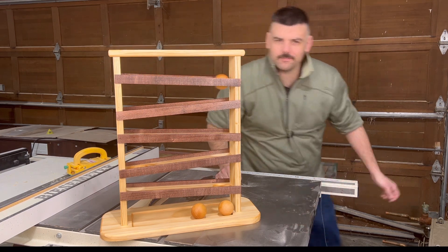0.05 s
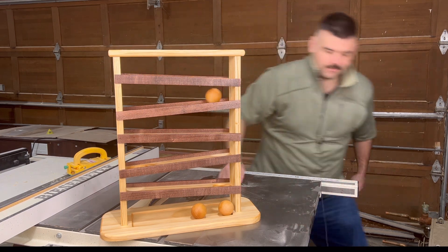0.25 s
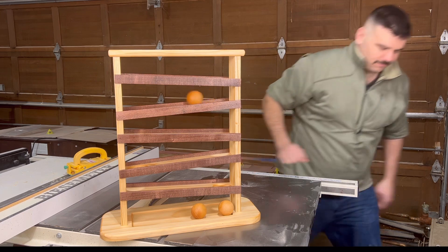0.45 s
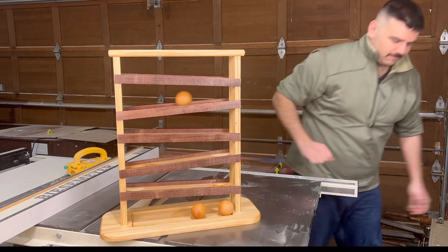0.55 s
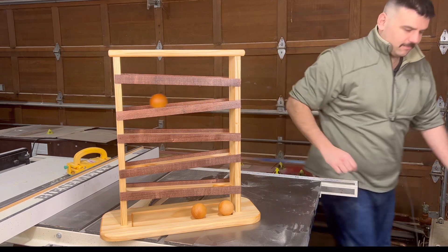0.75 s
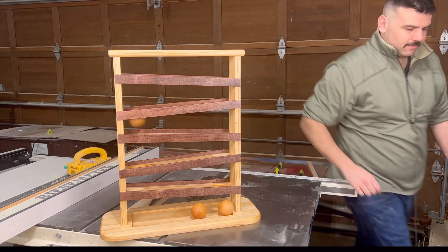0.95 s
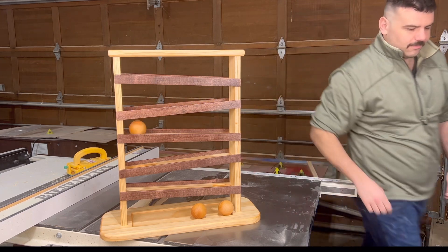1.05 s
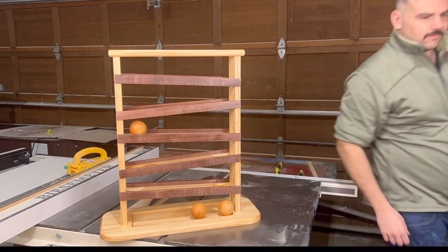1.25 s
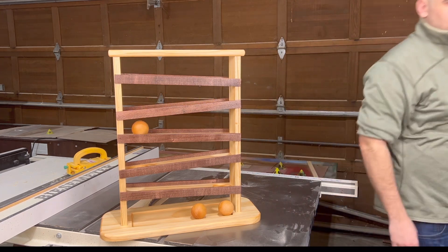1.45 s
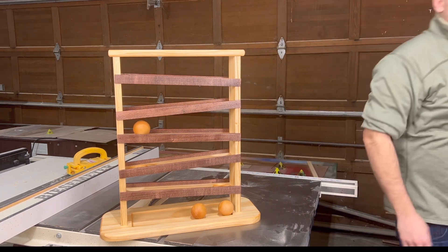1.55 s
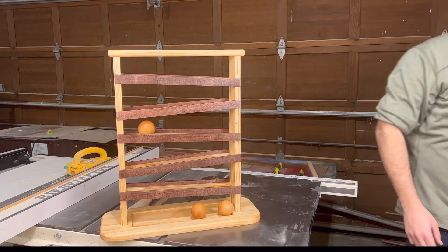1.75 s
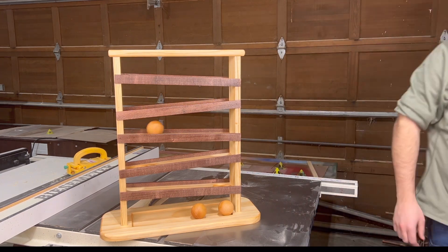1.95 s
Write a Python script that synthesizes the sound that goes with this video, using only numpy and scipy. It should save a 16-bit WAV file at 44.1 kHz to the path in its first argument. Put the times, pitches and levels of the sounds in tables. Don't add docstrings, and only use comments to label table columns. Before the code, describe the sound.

A wooden ball knocks sharply down wooden ramps in an echoing workshop, rolling faintly between drops.

```python
import sys
import numpy as np
from scipy import signal
from scipy.fft import rfft, irfft, next_fast_len
from scipy.io import wavfile

SR = 44100
rng = np.random.default_rng(int(sys.argv[2]) if len(sys.argv) > 2 else 0)


def ratio(d):
    e = np.asarray(d, float) / 20
    return 10 ** e


def file_out(sig):
    cols = np.atleast_2d(sig).T
    lim = np.clip(cols, -1, 1)
    pcm = np.round(lim * 32767).astype(np.int16)
    wavfile.write(sys.argv[1], SR, pcm)


N = 88200


def unit(x):
    return x / np.sqrt(np.mean(x ** 2) + 1e-20)


def along(points, hz):
    f, v = np.transpose(points)
    return np.interp(np.log(hz + 1), np.log(f + 1), v)


def curve(rows):
    return np.interp(np.arange(N) / SR, *np.transpose(rows))


def coloured(x, spectrum):
    m = next_fast_len(len(x) + 8192)
    gain = ratio(along(spectrum, np.fft.rfftfreq(m, 1 / SR)))
    return unit(irfft(rfft(x, m) * gain, m)[:len(x)])


def add(out, s, x):
    part = out[round(s * SR):][:len(x)]
    part += x[:len(part)]


def ring(hz, t60, t, rise):
    return np.sin(2 * np.pi * hz * t) * ratio(-60 * t / t60) * (1 - np.exp(-t / rise))


def grains(spectrum, spiky_db):
    strength_db = spiky_db * np.minimum(rng.exponential(size=N), 5)
    return coloured(rng.standard_normal(N) * ratio(strength_db), spectrum)


def air():
    # frequency in Hz, density in dB per Hz.
    hush_colour = [(12, -23.5), (22, 8), (35, -9.5), (86, -14.5), (450, -29), (1650, -37.5), (9950, -50),
                   (15500, -60.5), (16800, -120)]
    # time in seconds, level of the sway in dB.
    sway_level = [(0, -38), (.4, -26.5), (.8, -38), (1.1, -29.5), (1.38, -22.5), (1.7, -30), (1.93, -28.5),
                  (2, -27)]
    # frequency in Hz, gain in dB.
    sway_colour = [(.5, -36.5), (2, 4), (4, -8.5), (9, -5), (18, -48.5), (40, -33.5), (100, -120)]
    hush = ratio(-48.5) * coloured(rng.standard_normal(N), hush_colour)
    sway = ratio(curve(sway_level)) * coloured(rng.standard_normal(N), sway_colour)
    return hush + sway


def shirt_rustle():
    # time in seconds, level in dB.
    rustle_level = [(0, -66.5), (.06, -53), (.12, -64), (.17, -52), (.3, -65), (.44, -48.5), (.6, -67.5),
                    (.9, -82), (1.25, -66), (1.41, -59), (1.56, -78), (1.7, -65), (1.83, -69.5),
                    (1.96, -55.5), (2, -59.5)]
    # frequency in Hz, density in dB per Hz.
    cloth_colour = [(1400, -31.5), (2300, -6.5), (3100, 0.5), (3600, -2), (4700, -2), (9300, -18),
                    (16000, -36.5)]
    return ratio(curve(rustle_level)) * grains(cloth_colour, spiky_db=2.5)


def shirt_ticks():
    # start in seconds, level in dB, pitch in Hz.
    ticks = [(.1345, -50, 5000), (.569, -52, 9000), (.630, -51, 10000), (.691, -48, 9000),
             (.720, -53, 7000), (1.294, -50, 8500), (1.323, -49, 10000), (1.354, -53, 11000),
             (1.378, -45, 5000), (1.387, -50, 11000), (1.394, -53, 12000), (1.404, -52, 11000),
             (1.423, -50, 6500), (1.435, -47, 9000), (1.4385, -49, 6500), (1.448, -49, 7000),
             (1.463, -47, 6500), (1.6853, -51, 5000), (1.7115, -51, 5000), (1.7537, -47, 10000),
             (1.9428, -52, 3200), (1.9652, -46, 4000)]
    decay_cycles, gain_db = 1.4, 7
    out, t = np.zeros(N), np.arange(SR // 4) / SR
    for s, db, hz in ticks:
        t60 = decay_cycles / hz * np.log(1000)
        add(out, s, ratio(db + gain_db) * ring(hz, t60, t, .00005))
    return out


def footfalls():
    # start in seconds, level in dB, pitch in Hz, t60 in seconds.
    thumps = [
        (.085, -20, 66.5, 0.033),
        (0.269, -26.5, 30, 0.18),
        (1.073, -33, 73, 0.023),
        (1.374, -24, 148, 0.0186),
        (1.964, -28.5, 300, 0.032),
        (1.957, -32, 60, 0.12),
    ]
    out, t = np.zeros(N), np.arange(SR // 4) / SR
    for s, db, hz, t60 in thumps:
        add(out, s, ratio(db) * ring(hz, t60, t, 0.3 / hz))
    return out


def rolling():
    # time in seconds, level in dB.
    roll_level = [(0, -49.5), (.1, -43.5), (.2, -48.5), (.6, -53), (.9, -57), (1.5, -56), (1.62, -82),
                  (1.69, -55.5), (1.74, -47), (1.82, -60), (1.9, -55.5), (2, -57.5)]
    # frequency in Hz, density in dB per Hz.
    rail_colour = [(120, -25.5), (200, -10.5), (224, -13.5), (343, 3.5), (394, 0.5), (878, -2.5),
                   (1220, -7), (1860, -7), (4000, -51.5), (5200, -83), (8800, -120)]
    return ratio(curve(roll_level)) * grains(rail_colour, spiky_db=6.5)


def room(x):
    # frequency in Hz, t60 in seconds.
    room_decay = [(100, 1.3), (300, 0.6), (1000, 0.74), (3000, 0.62), (8000, 0.5), (15000, 0.26)]
    first_wall_s, build_s = 0.0068, 0.0065
    hz, t, z = signal.stft(rng.standard_normal(SR), SR, nperseg=256)
    decay = ratio(-60 * t / along(room_decay, hz)[:, None])
    tail = signal.istft(z * decay, SR, nperseg=256)[1]
    tail = tail * (1 - np.exp(-np.arange(len(tail)) / SR / build_s))
    delayed = np.pad(x, (round(first_wall_s * SR), 0))
    return signal.fftconvolve(delayed, tail / np.linalg.norm(tail))


def frame_modes(modes, level_db, softer_db_per_khz, rise_s, t):
    far_db_per_khz = -2
    low_rise_cycles = 2.2
    body, far = np.zeros(len(t)), np.zeros(len(t))
    for hz, db, t60 in modes:
        mode_db = level_db + db + softer_db_per_khz * hz / 1000
        mode = ratio(mode_db) * ring(hz, t60, t, max(rise_s, low_rise_cycles / hz))
        body += mode
        far += ratio(far_db_per_khz * (hz / 1000 - 1.5)) * mode
    return body, far


def knocks():
    # start in seconds, ring in dB, crack in dB, room in dB, crack tilt in dB per kHz.
    blows = [
        (0.037, -14, -63, 1.5, -1.),
        (0.2241, 0, -5.5, 2, 1.66),
        (.9320, -3, -18.5, 2.5, 1.46),
        (1.0130, -8.5, -9.5, 4.5, 0.06),
        (1.638, -37, -45, 5, 0),
        (1.720, -34, -39.5, -1.5, -5),
    ]
    # frequency in Hz, level in dB, t60 in seconds.
    lip = [(284.5, -14, 0.31), (559, -6.5, .03), (919, -4, 0.028), (900, -15, 0.15), (1230, -10, 0.017),
           (2070, -19.5, .015)]
    first_drop = [(99.6, -32.5, 0.57), (299.8, -8.5, 0.083), (683, -10, 0.46), (709, -5, .05),
                  (1082, 1, 0.061), (1172, 1, 0.055), (1401, 4, 0.03), (1600, 2, 0.042), (2312, 1, .022),
                  (3004, -3, .025), (3850, -8.5, 0.018), (4530, -16.5, 0.043), (7740, -27.5, .015)]
    end_stop = [(330, -20, 0.071), (842, 0, .025), (1342, 11.5, 0.014), (1788, -7.5, 0.056),
                (2095, 1.5, 0.028), (2860, -17.5, 0.017), (4030, -29, .012), (7000, -36, 0.012)]
    second_drop = [(108, -32.5, 0.79), (295, 0, 0.017), (523, -7.5, 0.045), (872, 5.5, 0.032),
                   (1185, 8.5, 0.022), (1190, -24, 0.88), (1424, -1.5, 0.088), (1660, 9.5, 0.016),
                   (2305, -6, 0.036), (2593, -1.5, .03), (4240, -18, 0.019), (6150, -21.5, 0.032)]
    late_tap = [(1266, 2.5, 0.018), (1610, 13.5, 0.0084), (2050, 7, 0.012), (2460, -4.5, 0.022),
                (3970, -16.5, 0.064), (4500, -15, 0.022)]
    settle = [(347, -10.5, 0.033), (730, 0, 0.036), (1150, 0, 0.016), (1926, 3, 0.026), (2240, -1.5, 0.021)]
    struck_parts = [lip, first_drop, end_stop, second_drop, late_tap, settle]
    # delay in seconds, level in dB.
    rocking = [
        [],
        [(.0015, -6), (.0075, -3.5), (.0155, -6)],
        [],
        [(.0045, 0), (.0135, 3.5), (.023, -6)],
        [(.052, 2.5), (.075, 5)],
        [(.012, -8)],
    ]
    # frequency in Hz, density in dB per Hz.
    crack_colour = [(60, -21.5), (300, -2), (1000, -5.5), (2600, 5), (5000, -9), (10000, -33),
                    (15000, -47.5), (16700, -65), (17500, -120)]
    # echo delay in seconds, level in dB.
    walls = [
        (.0185, -8.5),
        (0.03, -7.5),
        (.052, -16),
    ]
    rise_s, crack_t60_s, puff_db = 0.00053, 0.04, 7.5
    scatter_t60_s = .035
    first_contact = (0.00026, 0.006)

    out, t = np.zeros(N), np.arange(SR // 2) / SR
    crack_envelope = ratio(-60 * t / crack_t60_s) * (1 - np.exp(-t / rise_s))
    impulse = 1. * (np.arange(len(t)) == 200)
    for (s, ring_db, crack_db, room_db, tilt_db), modes, rocks in zip(blows, struck_parts, rocking):
        colour = [(hz, db + tilt_db * hz / 1000) for hz, db in crack_colour]
        for k, (delay, loss_db) in enumerate([first_contact] + rocks):
            softer_db = -3 * k
            start = s + delay
            body, far = frame_modes(modes, ring_db + loss_db, softer_db, rise_s, t)
            crack = coloured(rng.standard_normal(len(t)), colour) * crack_envelope
            add(out, start, body + ratio(crack_db + loss_db + softer_db) * crack)

            puff = coloured(impulse, colour) / np.sqrt(len(t))
            scattered = far * ratio(-60 * t / scatter_t60_s)
            sent = scattered + ratio(crack_db + loss_db + puff_db) * puff
            add(out, start, ratio(room_db) * room(sent))
            for echo_s, echo_db in walls:
                add(out, start + echo_s, ratio(echo_db) * body)
    return out


def scene():
    man = shirt_rustle() + shirt_ticks() + footfalls()
    return (air() + man + rolling() + knocks())[None]


def band_limit(x):
    return signal.sosfilt(signal.butter(12, 16710, fs=SR, output="sos"), x)


def record(dry):
    clip_top, clip_hard, top_hz = .97, 8, 16600
    x = dry / (1 + np.abs(dry / clip_top) ** clip_hard) ** (1 / clip_hard)
    x = np.concatenate([x, x[:, ::-1]], axis=1)
    passband = np.fft.rfftfreq(2 * N, 1 / SR) < top_hz
    x = irfft(rfft(x) * passband, 2 * N)[:, :N]
    return band_limit(x)


dry = scene()
out = record(dry)
file_out(out)
```